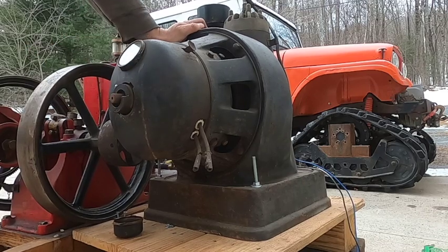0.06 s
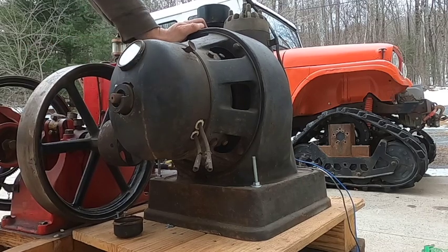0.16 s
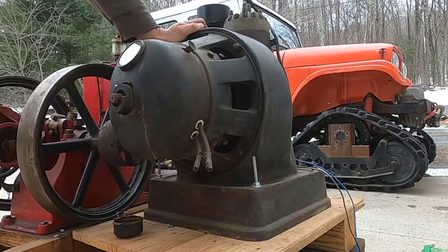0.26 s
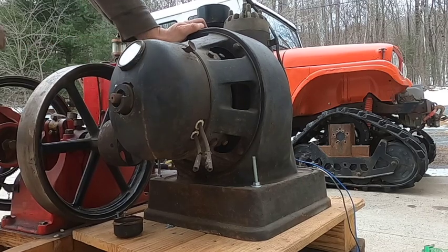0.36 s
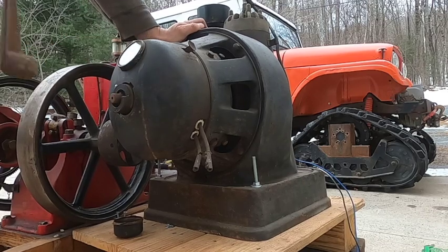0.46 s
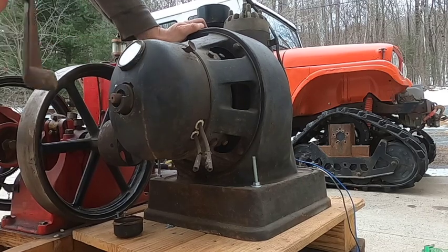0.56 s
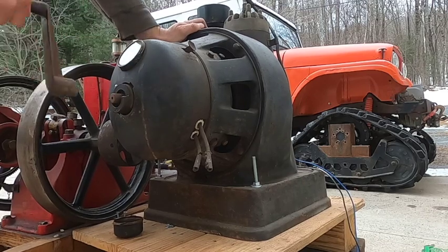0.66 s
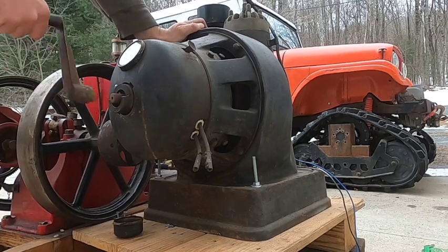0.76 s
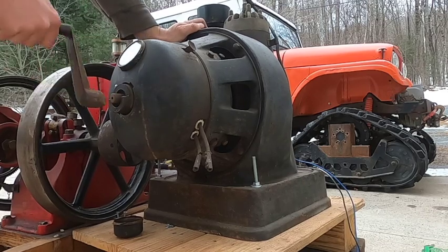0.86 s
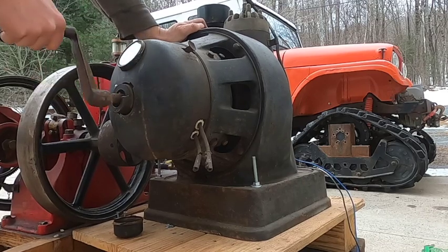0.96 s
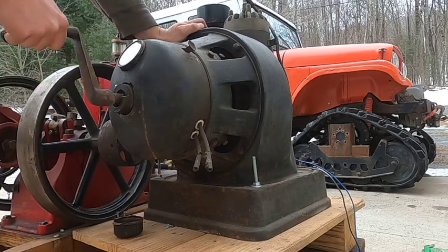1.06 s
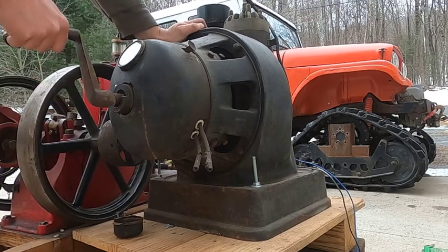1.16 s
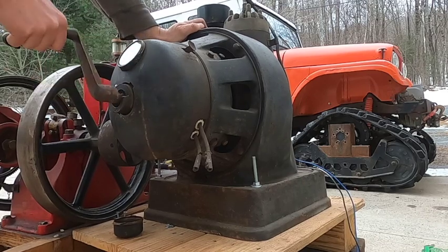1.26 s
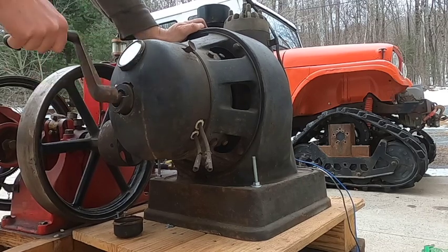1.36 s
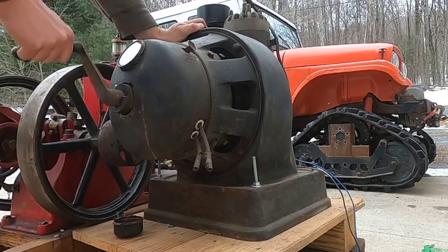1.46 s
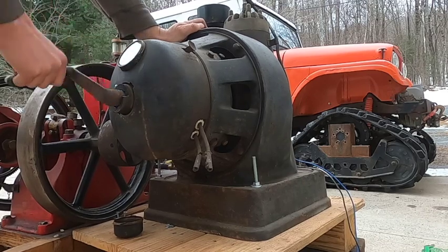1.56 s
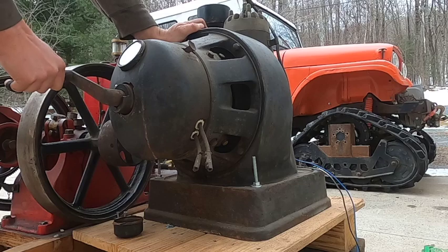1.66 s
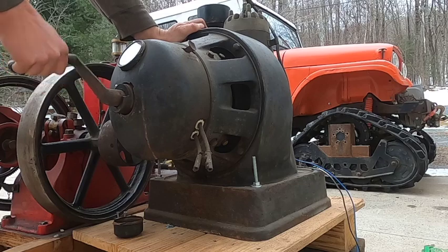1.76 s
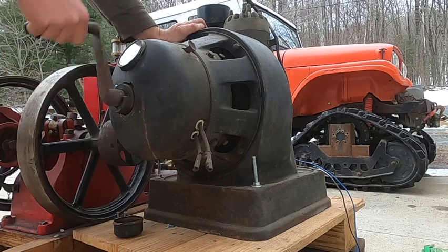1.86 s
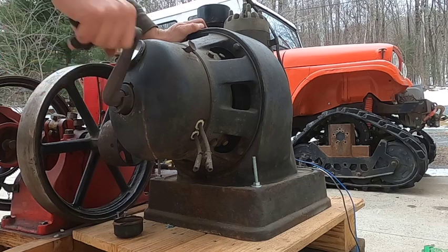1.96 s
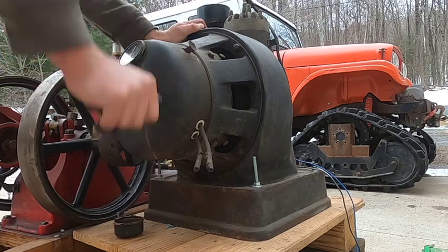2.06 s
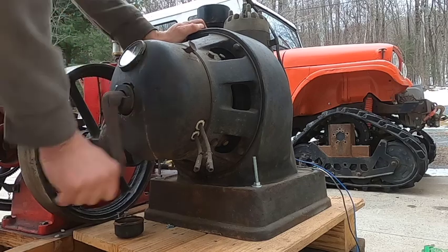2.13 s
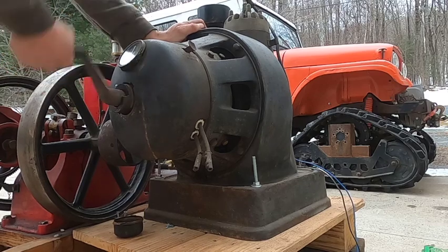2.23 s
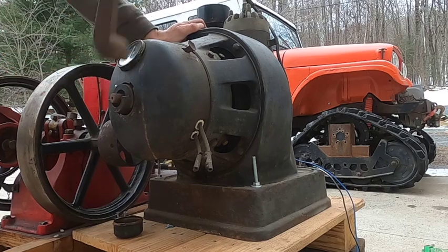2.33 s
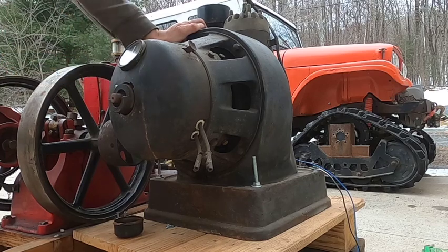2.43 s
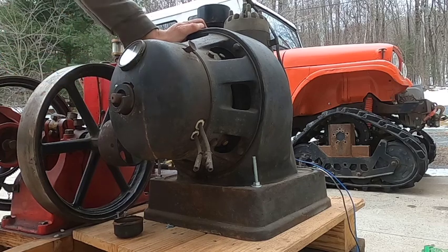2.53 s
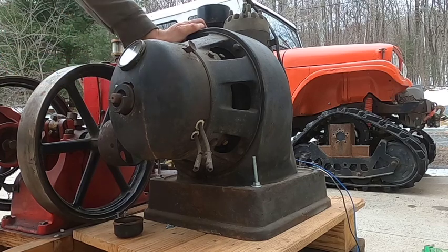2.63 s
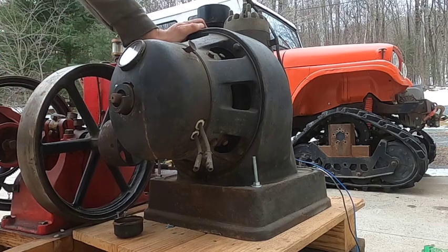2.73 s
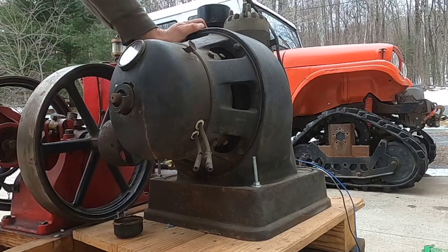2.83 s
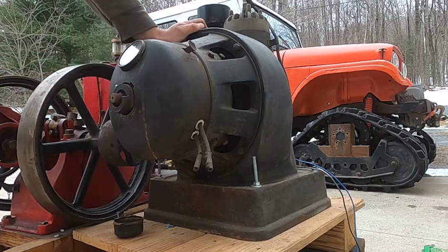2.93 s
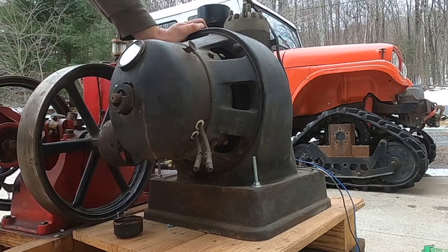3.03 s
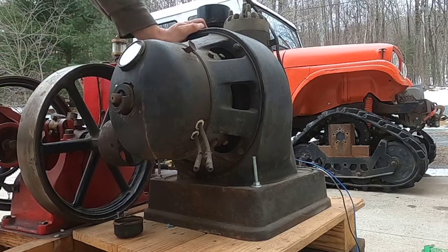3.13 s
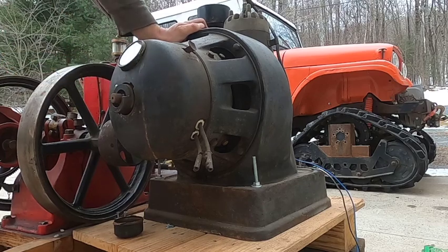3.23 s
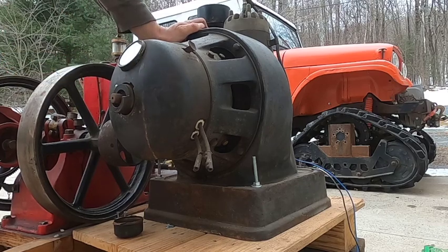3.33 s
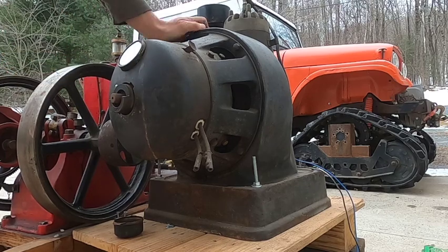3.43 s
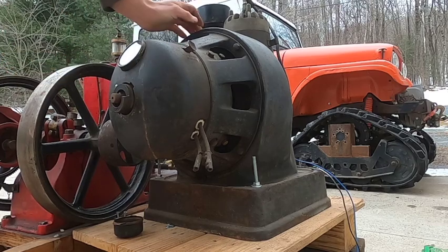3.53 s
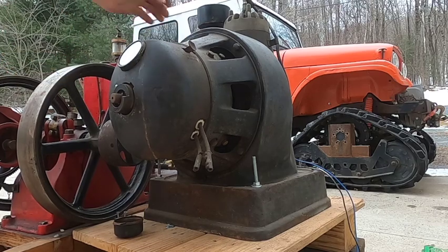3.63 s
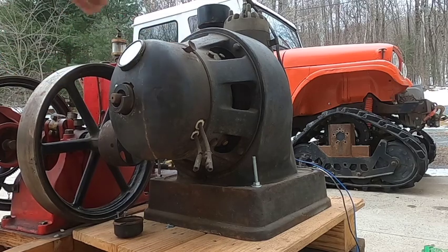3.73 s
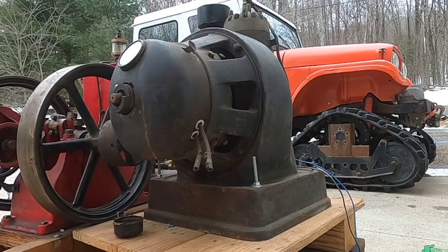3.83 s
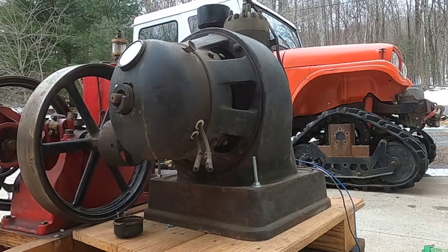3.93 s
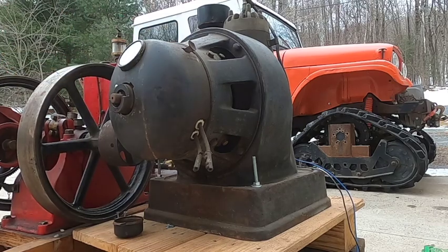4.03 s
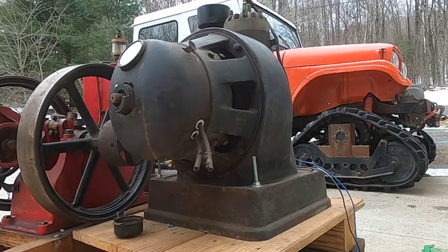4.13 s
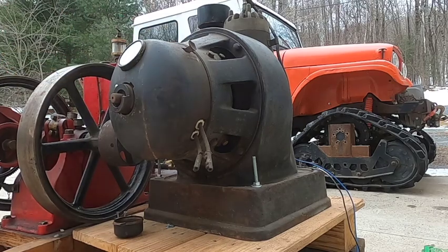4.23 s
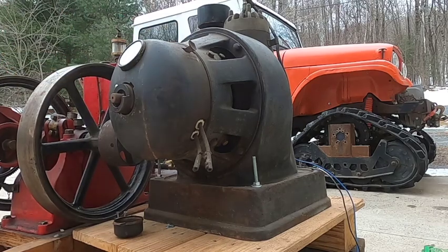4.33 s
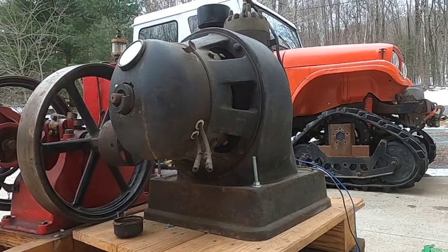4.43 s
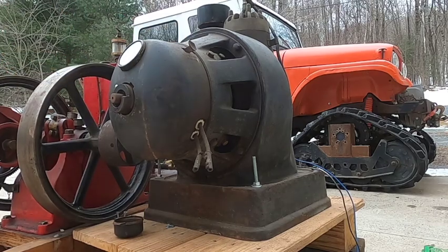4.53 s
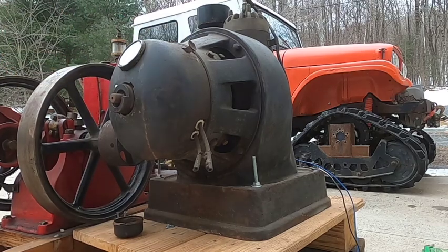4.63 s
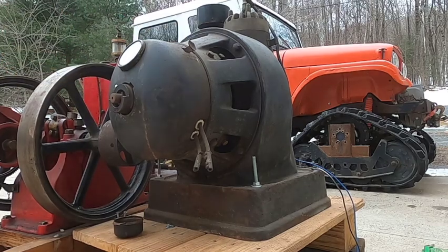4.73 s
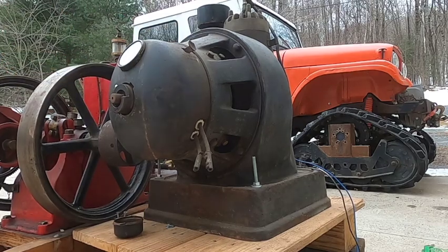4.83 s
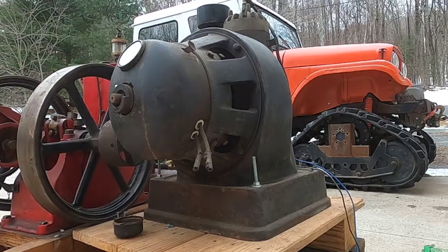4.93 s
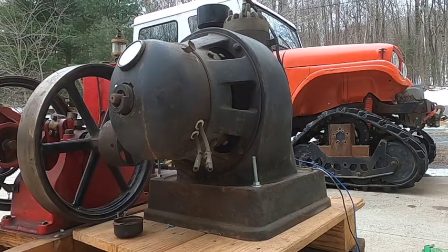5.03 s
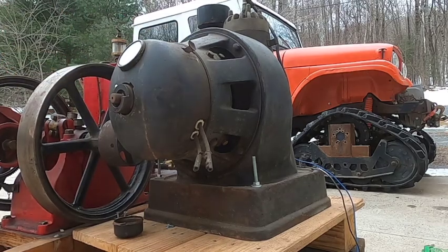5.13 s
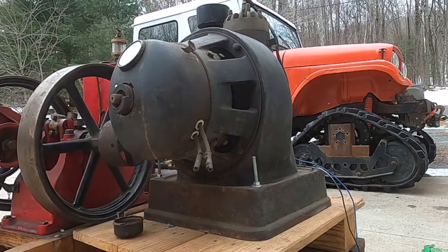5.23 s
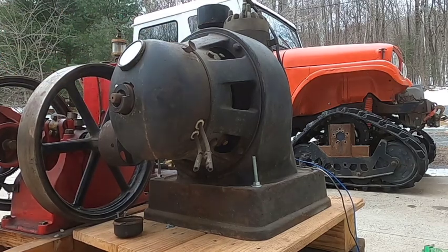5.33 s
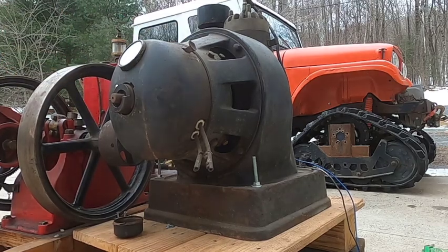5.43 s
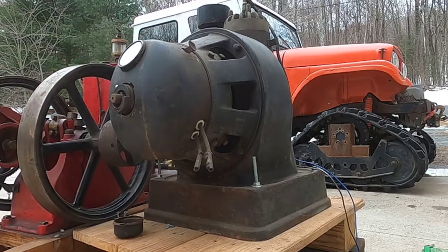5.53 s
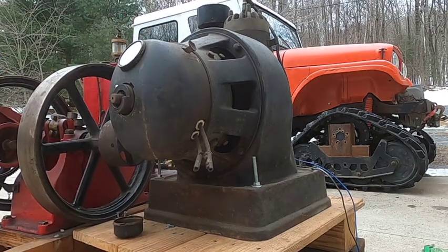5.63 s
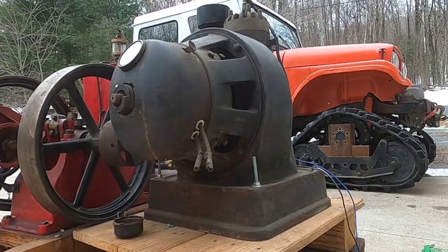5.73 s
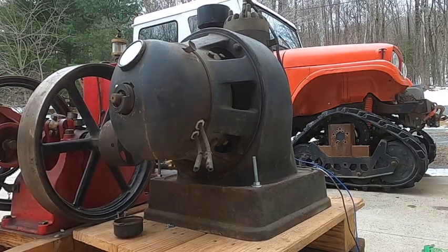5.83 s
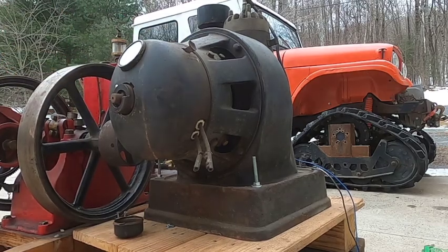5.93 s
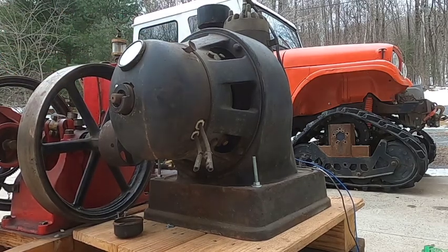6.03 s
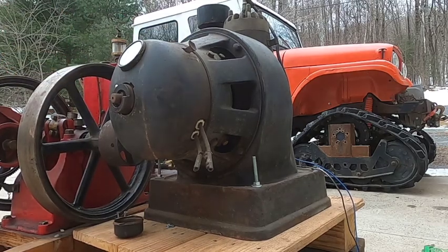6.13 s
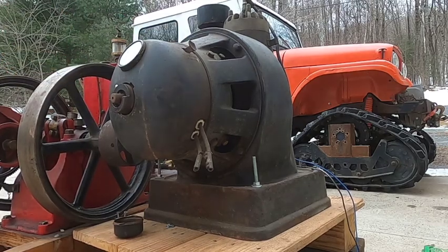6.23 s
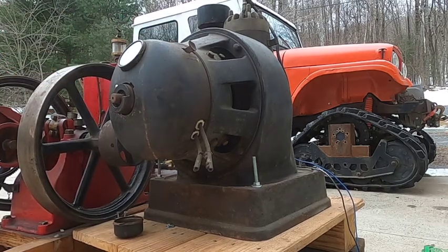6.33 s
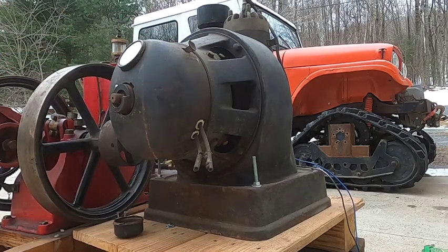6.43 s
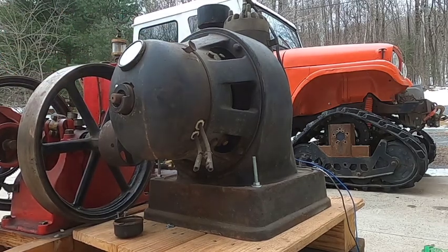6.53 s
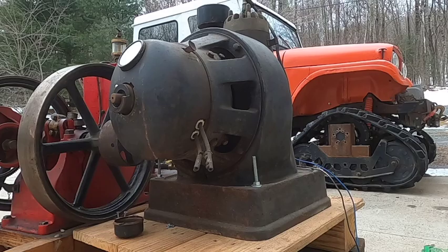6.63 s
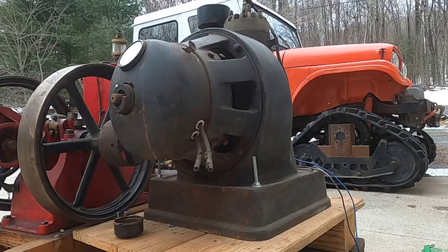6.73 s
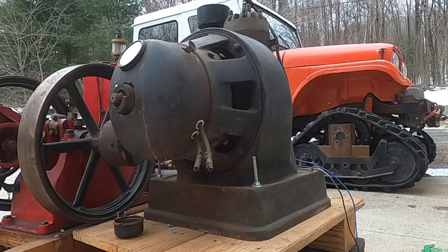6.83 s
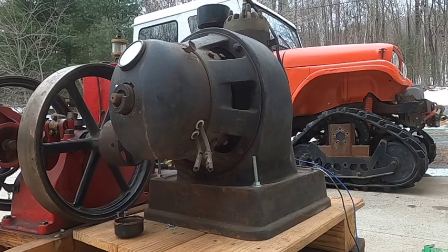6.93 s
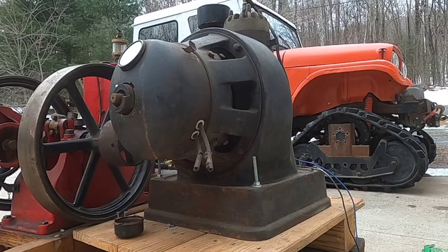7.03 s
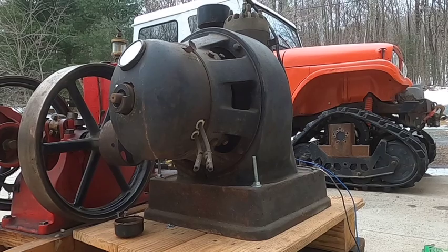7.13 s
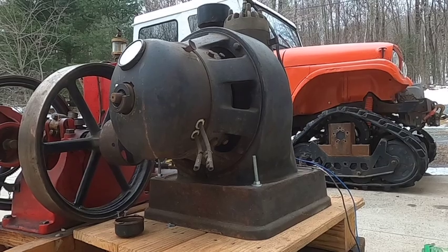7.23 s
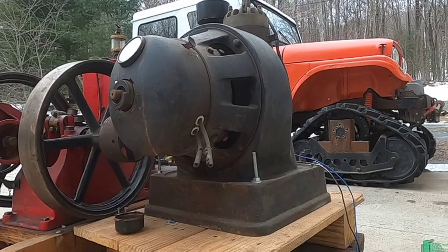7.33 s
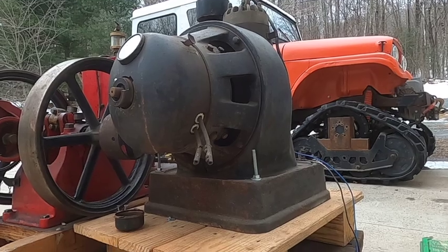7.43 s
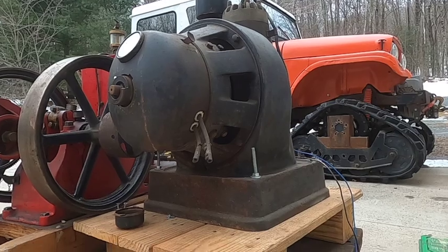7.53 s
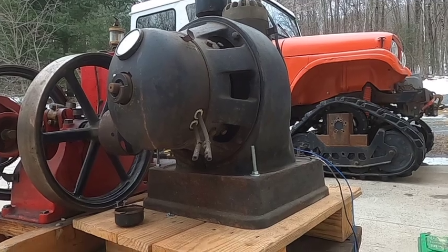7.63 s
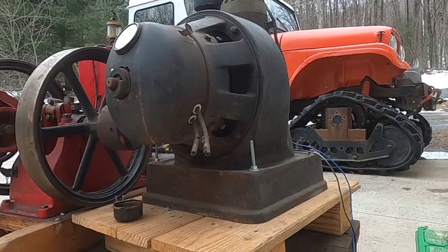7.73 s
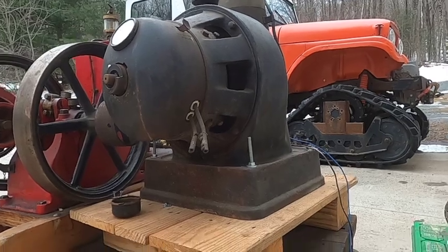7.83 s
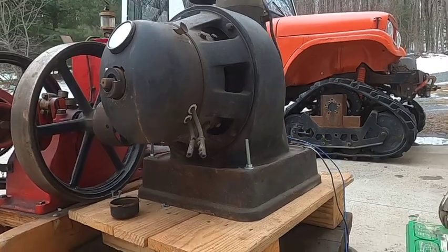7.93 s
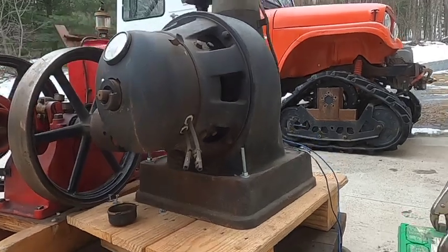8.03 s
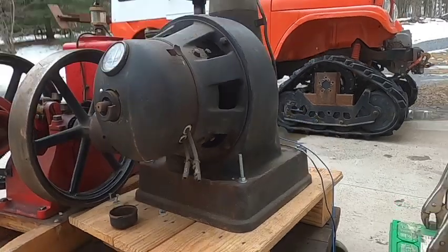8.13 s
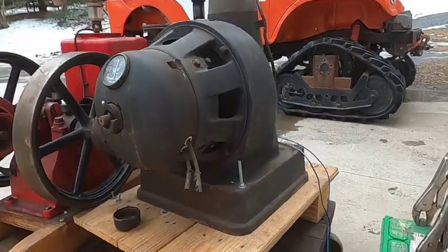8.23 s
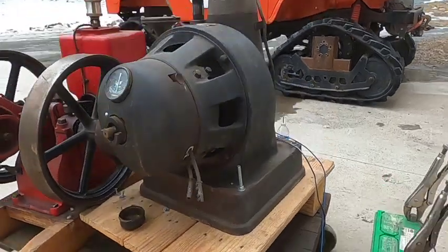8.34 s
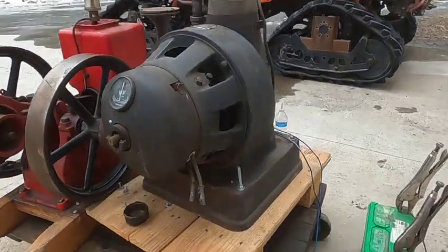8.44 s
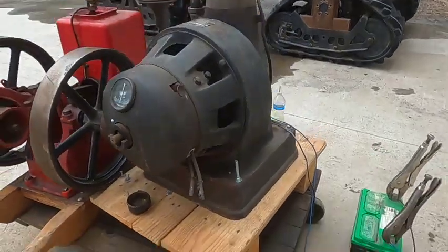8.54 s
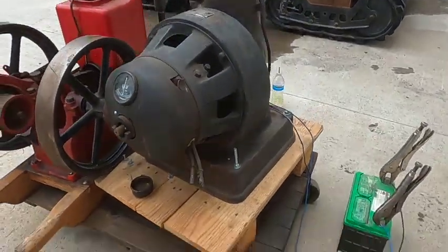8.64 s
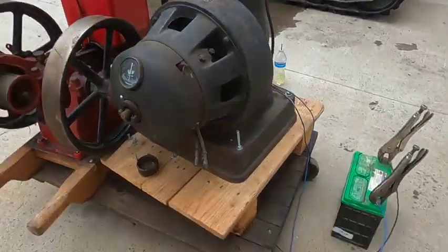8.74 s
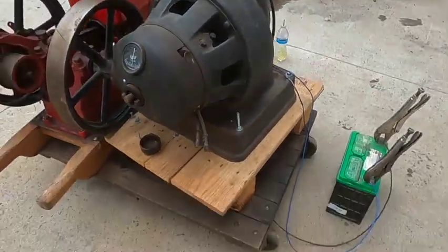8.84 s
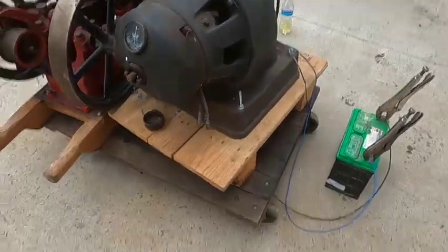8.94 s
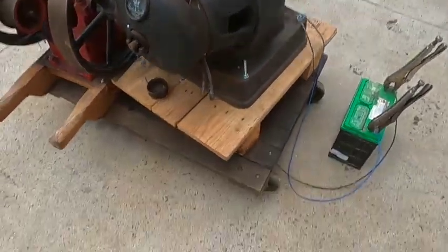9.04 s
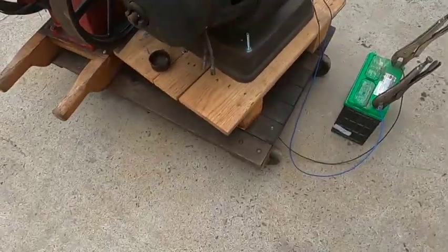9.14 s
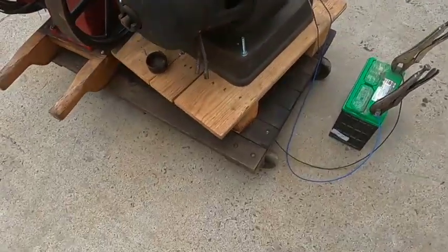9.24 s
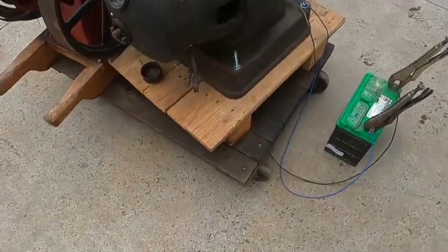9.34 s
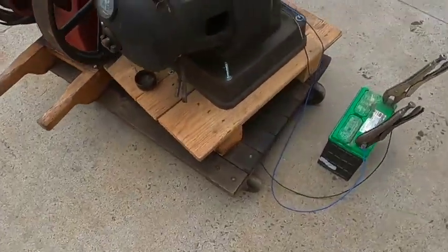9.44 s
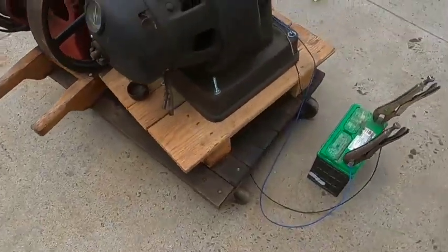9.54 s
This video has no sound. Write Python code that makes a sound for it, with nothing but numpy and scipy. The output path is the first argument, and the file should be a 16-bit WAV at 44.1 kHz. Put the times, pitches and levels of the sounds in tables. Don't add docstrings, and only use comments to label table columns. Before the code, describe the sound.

Old two-stroke engine wheezes to a stop, steel crank clanks, a hand swing fires uneven pops, then it catches and races up to a fast steady beat.

```python
import sys
import numpy as np
from scipy import signal
from scipy.fft import rfft, irfft
from scipy.io import wavfile

SR = 44100
rng = np.random.default_rng(int(sys.argv[2]) if len(sys.argv) > 2 else 0)


def output_pcm(signal):
    pcm = np.clip(np.atleast_2d(signal).T, -1, 1) * 32767
    wavfile.write(sys.argv[1], SR, np.round(pcm).astype(np.int16))


def gain_from_decibels(decibels):
    exponent = np.asarray(decibels, float) / 20
    return 10 ** exponent


N = 422478

WEAK_TURNS = (2, 4, 6)
SKIP_FROM_TURN = 128
RUN_FROM_HZ = 9
LAW_SPEEDS = (5.5, 10, 17, 25, 31.5)
# start_s, crack_peak_db
FIRST_TURNS = [
    (1.95, -40),
    (2.2481, -27),
    (2.4713, -21),
    (2.6504, -33),
    (2.8552, -20),
    (3.0269, -35),
    (3.2223, -20),
    (3.3827, -35),
    (3.5606, -21),
    (3.7118, -27),
]
# freq_hz, level_db
CRACK = [(500, 14), (1200, -2.5), (2000, -2.5), (3500, 5), (5500, 2), (8000, 5), (10000, -15.5),
         (15000, -25), (16500, -42)]


def rms_one(x):
    return x / np.sqrt(np.mean(x ** 2) + 1e-20)


def shape(x, points):
    hz, level_db = np.transpose(points)
    axis = np.log(np.arange(N // 2 + 1) * SR / N + 1)
    return irfft(rfft(x) * gain_from_decibels(np.interp(axis, np.log(hz + 1), level_db)), N)


def noise(points):
    # freq_hz, side_minus_mid_db
    spread = [(30, -24.5), (100, -31), (300, -29), (700, -19), (1500, -17), (3000, -14), (8000, -11),
              (13000, -3)]
    mid, side = shape(rng.standard_normal((2, N)), points)
    side = shape(side, spread)
    return rms_one(np.array([mid + side, mid - side]))


def clicks(s, level_db):
    out = np.zeros(N + SR) + 1e-18
    np.add.at(out, (np.asarray(s) * SR).astype(int), gain_from_decibels(level_db))
    return out[:N]


def dying(x, t60):
    return signal.lfilter([1], [1, -gain_from_decibels(-60 / (t60 * SR))], x)


def soft(x, ms):
    r = np.exp(-1000 / (ms * SR))
    return signal.lfilter([(1 - r) ** 2], [1, -2 * r, r * r], x)


def ring(x, modes):
    out = 0
    for hz, level_db, t60 in modes:
        r, w = gain_from_decibels(-60 / (t60 * SR)), 2 * np.pi * hz / SR
        out = out + signal.lfilter([0, gain_from_decibels(level_db) * np.sin(w)], [1, -2 * r * np.cos(w), r * r], x)
    return out


def coloured(x, peaks):
    modes = []
    for hz, width_hz, level_db in peaks:
        gain_db = level_db + 20 * np.log10(2 * np.pi * width_hz / SR)
        modes.append((hz, gain_db, np.log(1000) / np.pi / width_hz))
    return ring(x, modes)


def flutter(hz, depth_db):
    r = np.exp(-2 * np.pi * hz / SR)
    return gain_from_decibels(depth_db * rms_one(signal.lfilter([1], [1, -2 * r, r * r], rng.standard_normal(N))))


def shaft():
    # start_s, turns_per_s
    run_up = [(3.8624, 7.045), (4.1, 7.993), (4.4, 9.642), (4.75, 11.997), (5.1, 14.53), (5.5, 17.888),
              (6, 21.622), (6.5, 24.637), (7, 26.937), (7.6, 29.483), (8.2, 31.024), (8.7, 31.921),
              (9.15, 32.681), (9.6, 32.632)]
    now = np.arange(N) / SR
    first = [s for s, _ in FIRST_TURNS] + [run_up[0][0]]
    caught = now > first[-1]
    speed = np.where(caught, np.interp(now, *np.transpose(run_up)), LAW_SPEEDS[0])
    made = np.interp(now, first, np.arange(len(first))) - 1 + np.cumsum(speed * caught) / SR
    return made, speed


def by_speed(speed, law):
    return np.interp(speed, LAW_SPEEDS, law)


def falling(x, top_hz, end_hz, fall_s, t60, rise):
    last = np.maximum.accumulate(np.where(x > 1e-9, np.arange(N), 0))
    stretch = (shaft()[1] / LAW_SPEEDS[0]) ** rise * np.exp(.04 * rng.standard_normal(N))
    since = (np.arange(N) - last) / SR * stretch[last]
    turns = end_hz * since + (top_hz - end_hz) * fall_s * (1 - np.exp(-since / fall_s))
    return x[last] * gain_from_decibels(-60 * since / t60) * np.minimum(since / .003, 1) * np.sin(2 * np.pi * turns)


def air():
    # start_s, draught_db
    draught = [(0, -3), (.45, -4), (.62, -11), (.75, -17), (.9, -9), (1.05, -14), (1.3, -17), (1.49, -3),
               (1.68, -17), (1.98, -21), (2.12, -4), (2.25, 1), (2.5, 3), (2.66, 8), (2.78, 1), (3.0, 0)]
    # start_s, wind_db
    lull = [(1.1, 0), (1.3, -16), (1.9, -12), (2.1, -1), (6.1, 1), (6.9, -10), (8.2, -14), (8.8, -3)]
    # freq_hz, level_db_per_hz
    wind_outline = [(12, 0), (25, -7), (60, 2.5), (120, -16), (300, -70.5)]
    rumble_outline = [(12, -42.5), (20, -26.5), (229, 6), (286, -1), (427, -4), (504, -8.5), (584, -7),
                      (842, -26.5), (1070, -15), (1600, -69), (2080, -61), (3520, -120)]
    hiss_outline = [(710, 5.5), (1200, 10.5), (1700, 7), (3700, 1), (6520, -4.5), (8110, -5),
                    (10800, -19.5), (14200, -35), (16300, -60)]
    now = np.arange(N) / SR
    draught_db = np.interp(now, *np.transpose(draught))
    octaves = np.log2(shaft()[1] / LAW_SPEEDS[0])
    hiss = gain_from_decibels(np.minimum(-54 + .9 * draught_db + 7.3 * octaves, -41))
    rumble = gain_from_decibels(-40 + .8 * draught_db + 2.5 * octaves)
    wind = gain_from_decibels(-47 + .84 * draught_db + np.interp(now, *np.transpose(lull)) * (now > lull[0][0]))
    out = wind * flutter(2.4, 3) * noise(wind_outline)
    out = out + rumble * flutter(25, 2.5) * noise(rumble_outline)
    return out + hiss * flutter(31, 2.5) * noise(hiss_outline)


def hum():
    orders = (4, 5, 6, 7, 8, 9, 11)
    orders_db = (-26, -33, -20, -19.5, -17, -30, -8)
    # freq_hz, width_hz, level_db
    skid = [(149, 11, -11), (193, 23, -15), (244.6, 17, -4.5)]
    made, speed = shaft()
    out = 0
    for k, level_db in zip(orders, orders_db):
        lift = sum(gain_from_decibels(db) / (1 + (2 * (k * speed - hz) / width_hz) ** 2) for hz, width_hz, db in skid)
        out = out + gain_from_decibels(level_db) * lift * np.sin(2 * np.pi * k * made)
    return np.clip(made - SKIP_FROM_TURN + 1, 0, 1) * out


def shakes():
    # order, ahead_cycles, full_speed_db
    steady = [(1, 0.39, -33.5), (2, 0.24, -31.5), (12, 0.31, -34.5)]
    # order, ahead_cycles, level_db, panel_hz, width_hz
    passes = [(10, .5, -25, 238, 22), (11, .42, -29, 240, 20), (8, .33, -27, 170, 14),
              (7, .72, -28, 221, 12), (10, .32, -29, 302, 22), (11, .23, -25, 342, 26),
              (12, .25, -29, 350, 30)]
    pulse_db = (0, 18, 27, 21, 23)
    made, speed = shaft()
    out = sum(gain_from_decibels(db) * np.cos(2 * np.pi * (k * made + ahead)) for k, ahead, db in steady)
    out = out * (speed / LAW_SPEEDS[-1]) ** 2
    for k, ahead, db, hz, width_hz in passes:
        off = 2 * (k * speed - hz) / width_hz
        tone = np.cos(2 * np.pi * (k * made + ahead) - np.arctan(off))
        out = out + gain_from_decibels(db) / (1 + off ** 2) * tone * (made < SKIP_FROM_TURN)
    at = np.searchsorted(made, np.arange(9, SKIP_FROM_TURN))

    def pulse(ms):
        return soft(clicks(at / SR - 2 * ms / 1000, by_speed(speed[at], pulse_db)), ms)

    return out * (made > 9) + pulse(.35) - pulse(1.6)


def contacts():
    per_turn = 110
    spot = (shaft()[0] * per_turn).astype(int)
    return rng.standard_normal(per_turn)[spot % per_turn] * (np.diff(spot, prepend=spot[0]) > 0)


def grind(spots):
    grind_db = (-53, -37.5, -37, -29, -37)
    # freq_hz, width_hz, level_db
    casing = [(298, 39, -1), (490, 240, 4), (780, 86, 8.5), (1050, 130, 8)]
    speed = shaft()[1]
    x = coloured(soft(spots * flutter(200, 2.5), .12), casing)
    return gain_from_decibels(by_speed(speed, grind_db)) * x / np.std(x[speed > LAW_SPEEDS[-2]])


def handle():
    # start_s, peak_db, ring_db, pan_db, brightness_db_per_octave
    clanks = [(1.098, -17.5, -12.5, 1.5, -7), (1.117, -35.5, -19, 13, -11), (1.295, -35, -19, 3, -13),
              (1.321, -22, -8.5, -1, 3), (1.334, -35, 3, 2, 7.5), (1.476, -21.5, -10, -1, -1),
              (1.499, -33, 3, 0, 7.5), (1.49, -31, 4.5, 1, 4), (1.516, -4.5, -14, 1, 1),
              (1.532, -31, -9, 26, -16), (2.347, -33.5, 9.5, 12, -6), (2.35, -42.5, 15.5, 5, 8),
              (2.452, -35, -14, 13, 3.5)]
    # freq_hz, level_db_per_hz
    grit_outline = [(120, -16), (420, -2.5), (849, -4), (1690, -9.5), (3290, -8), (5170, -16.5),
                    (6530, -25), (8880, -26), (11000, -57), (15000, -72)]
    # freq_hz, level_db, t60_s
    handle_modes = [(554, -17, 0.12), (1110, -8, .13), (1360, -10, 0.1), (3898, -12, .08), (2148, -4, .07),
                    (4312, -14, 0.07), (2450, -16, 0.07), (3025, -3.5, .15), (4560, -13, 0.16),
                    (5100, -15, .1), (6120, -17, .045), (7600, -21.5, 0.14), (9050, -31, 0.065),
                    (8500, -30, 0.09)]
    cowl_modes = [(2570, -4, .45), (587, 6, .22), (807, 2, .25), (1755, -3, .19)]
    flung_modes = [(1330, -1, 0.083), (1450, 0, 0.071), (1038, -22, 0.16), (2204, -12, .08)]
    cowl_hit = [(1.53,), (-41,)]
    flung_hit = [(2.3495,), (-17,)]
    # from_s, to_s
    gripped_s = (1.45, 1.6)
    s, peak_db, ring_db, pan_db, bright_db = np.transpose(clanks)
    grit, out = noise(grit_outline), np.zeros((2, N))
    for ear, sign in enumerate((.5, -.5)):
        ear_db = peak_db + sign * pan_db
        hit, edge = clicks(s, ear_db), clicks(s, ear_db + 3.2 * bright_db)
        body = soft(grit[ear], .12)
        sharp = grit[ear] - body
        out[ear] = body * (gain_from_decibels(-13) * dying(hit, .045) + gain_from_decibels(-20) * dying(hit, .2))
        out[ear] += sharp * soft(gain_from_decibels(-12) * dying(edge, .031) + gain_from_decibels(-24.5) * dying(edge, .17), .62)
    now = np.arange(N) / SR
    gripped = (now > gripped_s[0]) & (now < gripped_s[1])
    for hz, level_db, t60 in handle_modes:
        tilt_db = bright_db * np.log2(hz / 2500)
        hits = clicks(s, peak_db + ring_db + tilt_db + 1.5 * rng.standard_normal(len(s)))
        out += ring(hits * ~gripped, [(hz, level_db, t60)])
        out += ring(hits * gripped, [(hz, level_db, t60 * .35)])
    return out + ring(clicks(*cowl_hit), cowl_modes) + ring(clicks(*flung_hit), flung_modes)


def cover(crack):
    # start_s, peak_db
    barks_at = [
        (4.923, -20),
        (4.993, -13),
        (5.062, -11.5),
        (5.132, -11.5),
        (5.197, -11),
        (5.27, -10),
        (5.337, -11.5),
        (5.394, -23),
        (5.461, -36),
    ]
    # start_s, turns_after_port, level_db, odd_turn_db
    knocks_at = [(6.7, 0.8, -38, 2), (6.85, 0.7, -19.5, -2), (7.55, 0.77, -20.5, -4),
                 (7.619, 0.53, -22.5, 3), (8.3, .66, -22.5, 2), (8.5, 0.5, -33, 3), (9.099, 0.79, -33, 4),
                 (9.2, 0.87, -25, 4), (9.6, .8, -29.5, 7)]
    # start_s, peak_db
    ticks_at = [(0.0344, -51), (0.0943, -26), (0.3859, -47.5), (0.411, -33), (0.4287, -26.5), (0.544, -51),
                (0.9155, -32)]
    # freq_hz, level_db, t60_s
    cover_modes = [(1090, 0, .035), (940, -6, .03), (1330, -6, .025), (600, -6, .04), (2140, -22, .03)]
    wall_modes = [(907, 1, 0.026), (1340, -17, 0.03), (2636, -10, 0.014), (4670, -15, .018),
                  (7250, -23, 0.011)]
    fin_modes = [(2500, -2, .025), (4450, 0, .03), (3300, -8, .02)]
    ping_db = (-5, -10.5, -6.5, -5.5, -5)
    fins_db = (-42, -20, -16.5, -12, -14.5)
    spit_db = (-1.5, -19, -7, -0.5, 0)
    made, speed = shaft()
    turn = np.arange(1, int(made[-1]))
    at, ahead = np.searchsorted(made, turn) / SR, np.searchsorted(made, turn + 1) / SR
    s, share, level_db, odd_db = np.transpose(knocks_at)
    knock_db = np.interp(at, s, level_db, left=-99) + np.interp(at, s, odd_db) * (turn % 2)
    knock_db = knock_db + 2 * rng.standard_normal(len(turn))
    knocks = clicks(at + np.interp(at, s, share) * (ahead - at), knock_db)
    barks = clicks(*np.transpose(barks_at))
    rattle = rng.standard_normal(N) * (rng.random(N) < 6000 / SR)
    blows = knocks + gain_from_decibels(-5) * barks + gain_from_decibels(-15) * rattle * dying(barks + knocks, .06)
    out = ring(soft(blows, .1), cover_modes)
    crack = crack + gain_from_decibels(-4) * clicks(*np.transpose(ticks_at))
    for mode in wall_modes:
        chance_db = 5.5 * rng.standard_normal(N)
        out = out + ring(crack * gain_from_decibels(by_speed(speed, ping_db) + chance_db), [mode])
    buzz = rattle * (rng.random(N) < .15) * soft(dying(crack, .15), 3)
    out = out + gain_from_decibels(by_speed(speed, fins_db)) * ring(buzz, fin_modes)
    spit = soft(dying(crack, .0043), .15) * gain_from_decibels(by_speed(speed, spit_db) + 10)
    return out + spit * noise(CRACK)


def cycle():
    # turns, casing_travel_s
    bump_at = (.48, 0.005)
    rattle_at = (0.345, 0.00187)
    thump_at = (.2, 0.0034)
    # start_s, peak_db
    slow_bumps = [
        (0.226, -13.5),
        (0.59, -19.5),
        (0.70, -38),
        (2.03, -35),
    ]
    slow_rattles = [(0.001, -29), (0.23, -33), (0.283, -32.5), (0.393, -33.5), (0.605, -40), (0.688, -60),
                    (0.871, -32), (1.197, -40), (2.049, -54), (2.154, -30.5)]
    slow_thumps = [
        (0.014, -9.5),
        (0.34, -15),
        (0.805, -23),
        (0.934, -19.5),
        (2.198, -10.5),
    ]
    slow_pops = [
        (0.078, -7),
        (0.411, -3.5),
        (0.89, -8),
        (1.14, -28),
        (1.602, -33),
        (2.255, -4),
    ]
    slow_snaps = [(0.207, -23), (0.281, -37), (0.56, -30), (0.682, -39), (2.026, -34.5)]
    # start_s, level_db
    first_snaps = [(2.379, -20.5), (2.545, -17.5), (2.753, -27.5), (2.932, -24), (3.129, -29), (3.288, -21),
                   (3.48, -32), (3.628, -20.5), (3.786, -22)]
    first_chuffs = (2.398, 2.584, 2.787, 2.967, 3.157, 3.321, 3.501, 3.657, 3.810)
    bump_db = (-9.5, -12, -6.5, -11, -10)
    chuff_db = (-23.5, -20.5, -20.5, -19, -20.5)
    thump_db = (-6.5, -6, -12.5, -35, -7)
    pop_db = (-18.5, -10.5, -6, -5.5, -1)
    overtone_db = (-16, -17, -23, -20.5, -22.5)
    crack_law_db = (-19, -16.5, -16.5, -20, -24)
    snap_law_db = (-25.5, -19, -17, -27, -31.5)
    unburnt_db = (1, 0.5, -2, 7.5, -5)
    governed_db = (-2, -4, -8.5, -16, 13)
    # from_s, to_s
    nearer_s = (8.2, 9.2)
    made, speed = shaft()
    turn = np.arange(1, int(made[-1]) + 1)
    opens, before = np.searchsorted(made, turn) / SR, np.searchsorted(made, turn - 1) / SR
    period, pace = opens - before, speed[np.searchsorted(made, turn)]
    governed, unburnt = turn >= SKIP_FROM_TURN, np.isin(turn, WEAK_TURNS)
    skipped = governed & (turn % 2 == 0)
    weak = skipped | unburnt
    chance = rng.standard_normal((len(turn), 9))

    laws = (bump_db, chuff_db, thump_db, pop_db, overtone_db)
    force = []
    for law, less, cut, c in zip(laws, unburnt_db, governed_db, chance.T):
        force.append(by_speed(pace, law) + less * unburnt + cut * governed + 1.5 * c)
    force[1] = force[1] - .5 * (turn % 2) * pace / LAW_SPEEDS[-1]
    in_step, clean = (pace > RUN_FROM_HZ) & ~governed, ~unburnt & ~governed
    blast_db = force[3]
    for k, off in ((0, in_step), (2, in_step), (3, clean), (4, clean)):
        force[k] = force[k] - 90 * off

    late = opens + .07 * period * weak
    at = [opens - share * period + travel for share, travel in (bump_at, rattle_at, thump_at)]
    at = [a + .002 * period * chance[:, 5 + k] for k, a in enumerate(at)]
    at[1][:len(first_chuffs)] = first_chuffs
    slow = [slow_bumps, slow_rattles, slow_thumps, slow_pops]
    parts = [clicks(a, f) + clicks(*np.transpose(e)) for a, f, e in zip(at + [late], force, slow)]
    fired = clicks(opens[~weak], blast_db[~weak] - 90 * clean[~weak])
    suck = clicks(opens[~weak] - .0004, blast_db[~weak])
    overtone = clicks(late, force[4])

    crack_db = by_speed(pace, crack_law_db) + np.interp(opens, nearer_s, (0, 6.5))
    first_db = [db for _, db in FIRST_TURNS[2:]]
    crack_db[:len(first_db)] = first_db
    crack = clicks(late, crack_db + 1.5 * chance[:, 8] - 1 - 17 * skipped)

    snap_s, snap_db = opens - .5 * period, by_speed(pace, snap_law_db)
    snap_s[:len(first_snaps)], snap_db[:len(first_snaps)] = np.transpose(first_snaps)
    snap = clicks(snap_s, snap_db) + clicks(*np.transpose(slow_snaps))
    return parts + [fired, suck, overtone, snap], crack


def exhaust_crack(crack):
    # start_s, peak_db
    puffs_at = [(0.075, -35), (0.087, -24), (0.2544, -64), (0.404, -24.5), (0.425, -27.5), (0.542, -36.5),
                (0.908, -24.5), (1.001, -49), (2.259, -15), (2.475, -18), (2.667, -20.5), (3.225, -23),
                (3.71, -17), (3.865, -35), (2.9547, -49), (3.044, -34), (3.09, -58), (3.36, -45),
                (3.399, -24.5)]
    # freq_hz, level_db, t60_s
    stub = [(2430, -17, 0.033), (3900, -55, 0.1), (4120, -18, 0.18), (5480, 19, 0.018), (8090, -46, 0.045)]
    # freq_hz, width_hz, level_db
    tail = [(2600, 1000, 4), (4170, 90, 5), (4780, 220, -7), (5800, 3700, -4.5), (7670, 110, -19)]
    tail_db = (-5, -15, -22, -26.5, -24)
    jet_db = (0, -3, -1.5, -0.5, 0.5)
    dull_jet_db = (-8, -5, -1.5, -.5, -.5)
    burst = soft(dying(crack, .014), .3) * gain_from_decibels(7)
    lead = np.roll(crack, -round(.011 * SR))
    burst = burst + gain_from_decibels(-31) * soft(dying(lead, .035), .73)
    jet, speed = noise(CRACK), shaft()[1]
    middle = signal.sosfilt(signal.butter(1, [900, 3000], "band", fs=SR, output="sos"), jet)
    jet = jet - (1 - gain_from_decibels(by_speed(speed, dull_jet_db))) * middle
    puffs = clicks(*np.transpose(puffs_at))
    whistle = rms_one(ring(rng.standard_normal(N), [(3850, 26, .0086), (4100, -12, .0046)]))
    gain = gain_from_decibels(by_speed(speed, jet_db)) * burst + gain_from_decibels(-10.5) * dying(crack, .12)
    gain = gain + gain_from_decibels(-3) * flutter(270, 1.7) * soft(dying(puffs, .014), 7.5)
    after = flutter(90, 4) * dying(crack, .18) * coloured(jet, tail)
    out = jet * gain + gain_from_decibels(by_speed(speed, tail_db)) * after
    out = out + gain_from_decibels(-52) * ring(jet * burst, stub)
    return out + whistle * gain_from_decibels(-12) * soft(dying(puffs, .1), 2.5)


def running_body():
    # turns_before_port, late_s
    run_at = [
        (.4714, .0009),
        (.2752, .0058),
        (0, .0003),
    ]
    # freq_hz, level_db, t60_s
    run_pull = [
        [(135.7, -18.6, .105), (192, -23.2, .09)],
        [(140.9, -7, .049), (187.9, -13.9, .046)],
        [(123.2, 3, .016)],
    ]
    run_push = [
        [(211.1, -16, .03), (41.1, -27, .124)],
        [(162.5, -7.5, .032), (247, -22.5, .14)],
        [(138.1, .3, .045), (220, -9.1, .031), (404.7, -14.7, .0086)],
    ]
    run_db = [
        (4, 3.5, 7.8, 0.22, 3),
        (2.4, 4.5, 0.68, 0.37, 0.7),
        (2, 0, 0.69, 0.3, -2.5),
    ]
    after_db = (-23.5, -27.5, -29.5, -53, -40)
    # from_s, to_s
    shadow_s = (8.17, 8.9)
    made, speed = shaft()
    turn = np.arange(1, SKIP_FROM_TURN)
    at = np.searchsorted(made, turn)
    opens, period = at / SR, np.diff(np.searchsorted(made, np.arange(SKIP_FROM_TURN))) / SR
    chance, out = rng.standard_normal((len(turn), 3)), 0
    sounding = [speed[at] > RUN_FROM_HZ] * 2 + [~np.isin(turn, WEAK_TURNS)]
    for (share, late), pull, push, law, c, on in zip(run_at, run_pull, run_push, run_db, chance.T, sounding):
        hit_s, hit_db = opens - share * period + late, by_speed(speed[at], law) + .8 * c
        hits = clicks(hit_s[on], hit_db[on])
        out = out + ring(hits, push) - ring(hits, pull)
    low = signal.sosfilt(signal.butter(1, [105, 180], "band", fs=SR, output="sos"), out)
    out = out - np.interp(np.arange(N) / SR, shadow_s, (0, .57)) * low
    shudder = coloured(rng.standard_normal(N), [(152, 32, 14.3), (224, 49, 19), (380, 30, 10)])
    blast_tail = soft(dying(hits, .41), 4.1)
    return out + gain_from_decibels(by_speed(speed, after_db)) * rms_one(shudder) * blast_tail


def engine_body(spots, bump, rattle, thump, pop, fired, suck, overtone, snap):
    # freq_hz, level_db, t60_s
    crankcase = [(134.7, -4.5, 0.17), (237.1, 0.5, 0.25), (146, -12, 0.16)]
    reed_modes = [(407, -3.5, 0.17), (567, 0.5, 0.082), (764, -4, 0.082), (1032, -6.5, 0.07),
                  (1370, -19, 0.089)]
    reed_knock = [(551, 7.5, 0.075), (758, 0.5, 0.012), (1043, -0.5, 0.17), (1372, -4, 0.078)]
    pipe_modes = [(142, -10, 0.053), (75, -19, 0.02), (274, -5, 0.03), (400, 5, 0.036), (970, -25, 0.01)]
    # freq_hz, width_hz, level_db
    gurgle = [(238.6, 9, -7.5), (347, 64, 4.5), (415, 95, 2.5), (506, 76, -6)]
    gurgle_db = (23.1, 18.4, 11, 6.9, 4.8)
    knock_db = (-7.5, -7, -10, -22, 4)
    chirp_db = [
        (0, -1, -5, -9, -9),
        (-3, -12, -30, -30, -30),
    ]
    locked_share = (.1, .3, .65, .85, .8)
    speed, chuff_rise = shaft()[1], .277
    chatter = rng.standard_normal(N) * (rng.random(N) < 9000 / SR) * gain_from_decibels(-10)
    locked = by_speed(speed, locked_share)
    chatter = np.sqrt(1 - locked) * chatter + np.sqrt(locked) * spots * gain_from_decibels(-6)

    reed = ring(chatter * dying(gain_from_decibels(-4) * rattle + gain_from_decibels(-6.5) * snap, .066), reed_modes) * gain_from_decibels(-9)
    reed = reed + gain_from_decibels(-7.5) * ring(soft(rattle, .69), reed_modes)
    draw = soft(dying(gain_from_decibels(-1) * snap + gain_from_decibels(3) * rattle, .26), 1.8)
    reed = reed + gain_from_decibels(by_speed(speed, gurgle_db)) * coloured(chatter * draw * flutter(40, 2.5), gurgle)
    reed = reed + gain_from_decibels(by_speed(speed, knock_db)) * ring(soft(snap, .3), reed_knock)

    chuff = gain_from_decibels(-1 + by_speed(speed, chirp_db[0])) * falling(rattle, 745, 383.5, .01436, .18, chuff_rise)
    snap_peaks = [(450, 230, -1), (796, 180, -10), (1130, 170, -25), (1500, 290, -17)]
    chuff = chuff + gain_from_decibels(-14) * coloured(chatter * dying(snap, .02), snap_peaks)
    chuff = chuff + gain_from_decibels(by_speed(speed, chirp_db[1])) * falling(snap, 1345, 609, .0066, .042, chuff_rise)
    chuff = chuff * flutter(150, 1.8)

    suction = gain_from_decibels(-12) * np.roll(thump, -round(.0035 * SR))
    case = ring(soft(thump - suction, .47), crankcase) * gain_from_decibels(-4)
    knock = ring(soft(bump, .45), [(152, -1.5, .058), (220, -19, .018)])

    dip = -gain_from_decibels(23.5) * soft(suck, .2)
    blast = np.roll(fired, round(.00035 * SR))
    push = gain_from_decibels(34) * (soft(blast, .84) - soft(blast, 1.36))
    push = push + gain_from_decibels(46) * (soft(pop, 19) - soft(pop, 7.4))
    swell = ring(ring(pop, [(130, -35, .091)]), [(147, .037, .014)])
    pipe = ring(soft(blast, .83), pipe_modes) * gain_from_decibels(-41)
    pipe = pipe + ring(soft(overtone, .63), [(174.5, -5.5, .62), (207.4, -3.5, .21), (248, -.5, .077)])
    return reed + chuff + case + knock + dip + push + swell + pipe


def yard(x):
    # late_s, level_db
    echoes = [(.0045, -3), (0.009, -3.5), (0.028, -7.5), (0.044, -35)]
    dull = soft(x, .095) * rms_one(soft(rng.standard_normal(N), .39))
    return x + sum(gain_from_decibels(level_db) * np.roll(dull, round(late * SR), axis=-1) for late, level_db in echoes)


def scene():
    parts, crack = cycle()
    spots = contacts()
    background = air() + hum() + shakes() + grind(spots)
    bright = yard(exhaust_crack(crack) + handle())
    return background + bright + cover(crack) + running_body() + engine_body(spots, *parts)


def roll_off(x):
    return signal.sosfilt(signal.butter(12, 16470, fs=SR, output="sos"), x)


def record(dry):
    # freq_hz, level_db
    port_tilt = [(1500, 0), (3000, 1.1), (5000, -.4), (10000, -.1), (13000, -3.5)]
    # freq_hz, ahead_rad
    port_phase = [(10, 0), (300, -.04), (2000, -.3), (4100, -.75), (6600, -1.3), (9800, -1.2), (12300, -.3)]
    delay = np.exp(1j * np.interp(np.arange(N // 2 + 1) * SR / N, *np.transpose(port_phase)))
    ports = np.array([shape(irfft(rfft(dry[0]) * delay, N), port_tilt), dry[1]])
    ports = np.tanh(ports / .94)
    ports = signal.sosfilt(signal.butter(1, 25, "high", fs=SR, output="sos"), ports)
    ports = signal.sosfilt(signal.cheby2(10, 40, 16900, fs=SR, output="sos"), ports)
    return roll_off(ports)


dry = scene()
out = record(dry)
output_pcm(out)
```